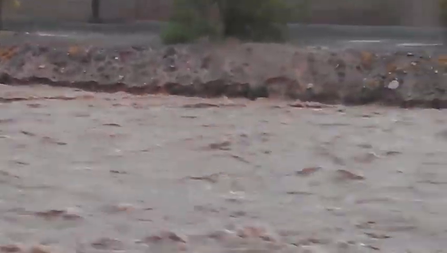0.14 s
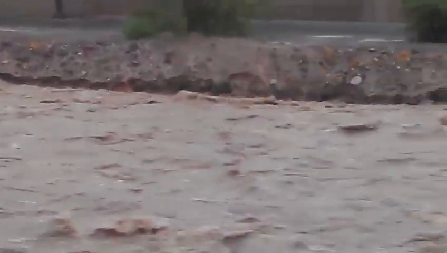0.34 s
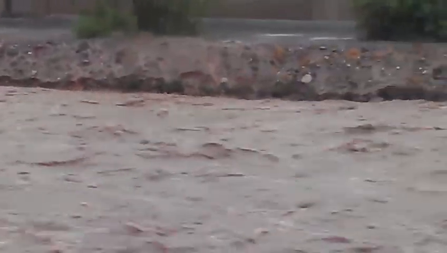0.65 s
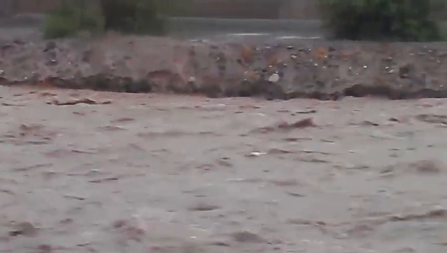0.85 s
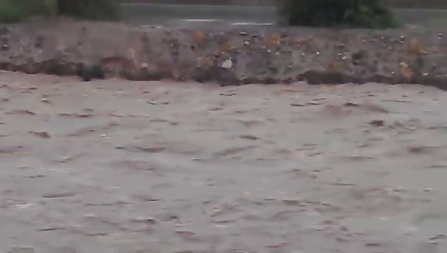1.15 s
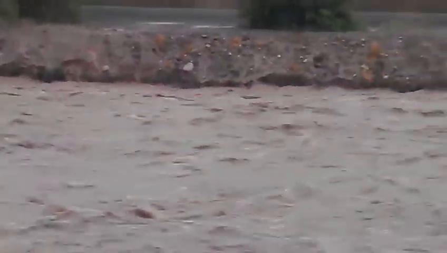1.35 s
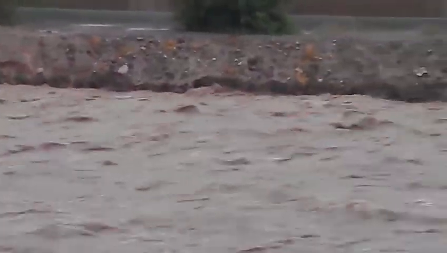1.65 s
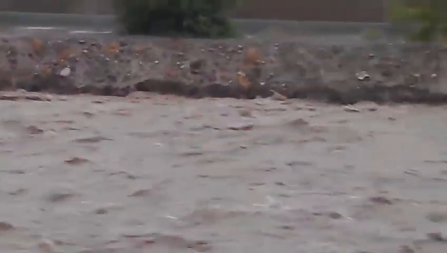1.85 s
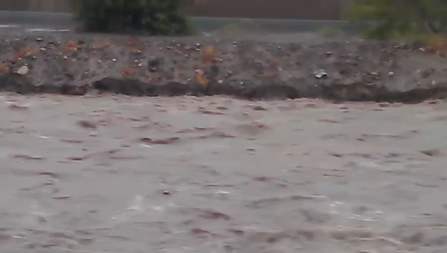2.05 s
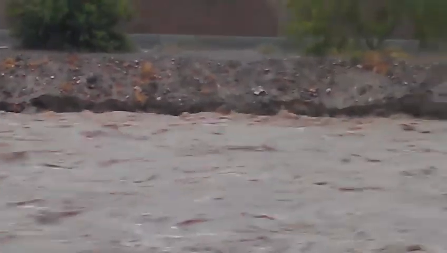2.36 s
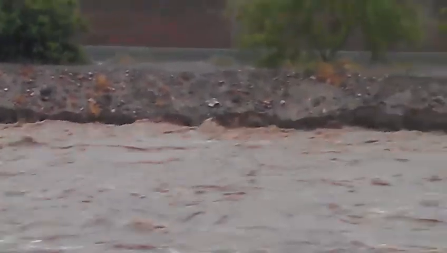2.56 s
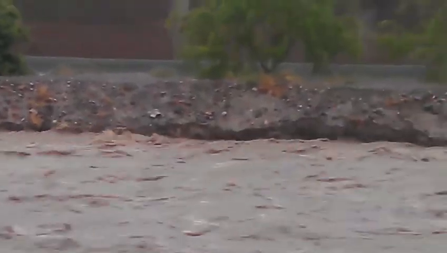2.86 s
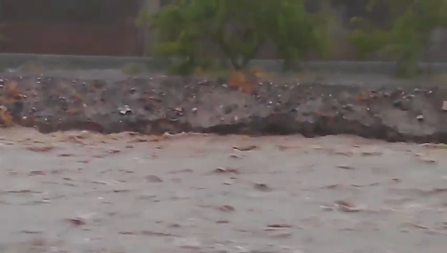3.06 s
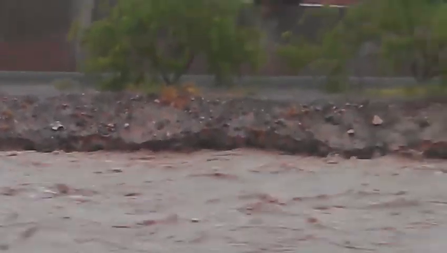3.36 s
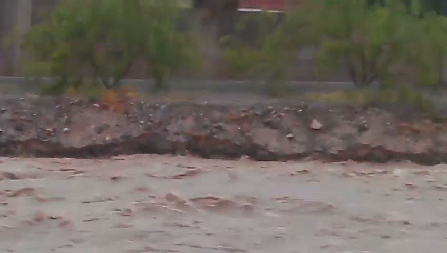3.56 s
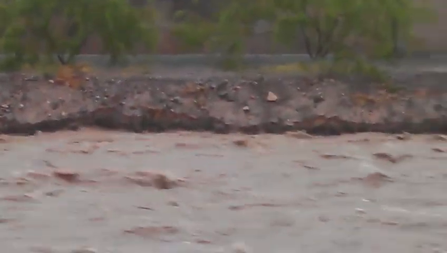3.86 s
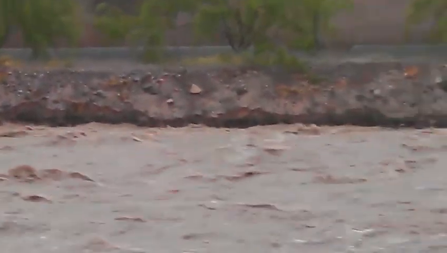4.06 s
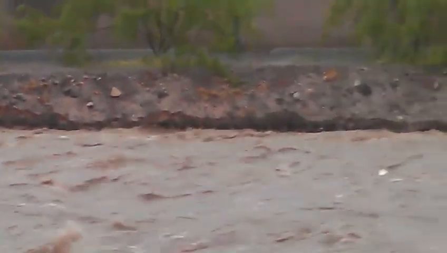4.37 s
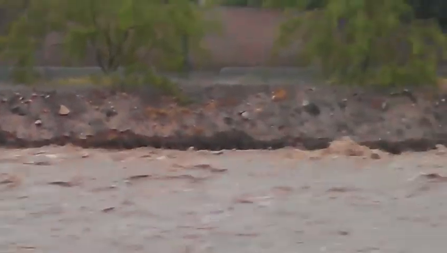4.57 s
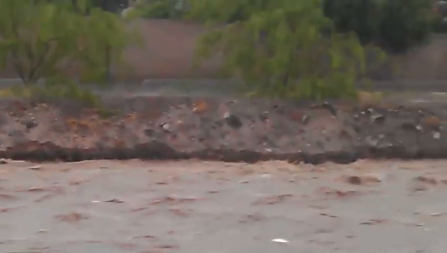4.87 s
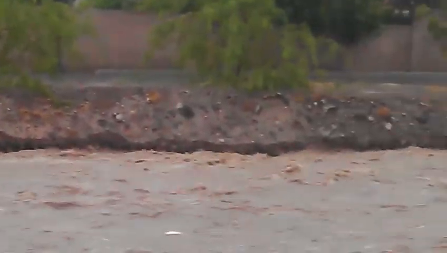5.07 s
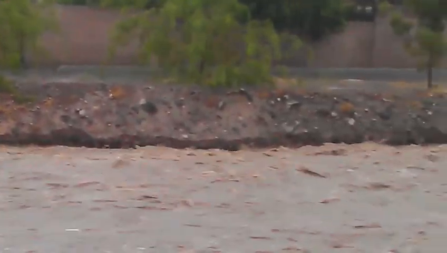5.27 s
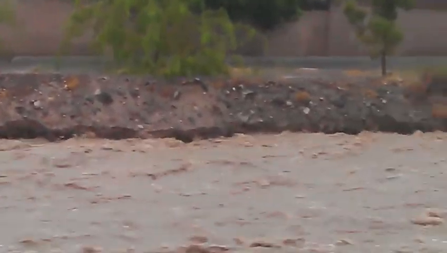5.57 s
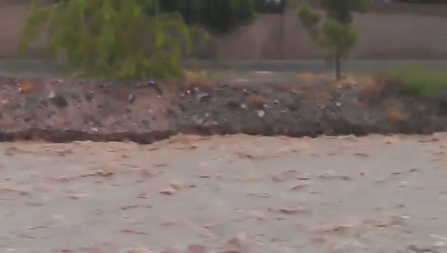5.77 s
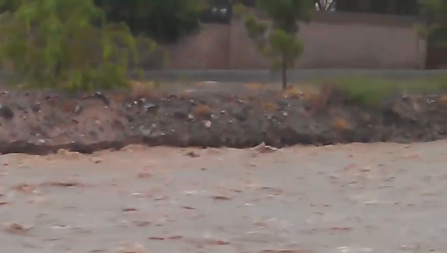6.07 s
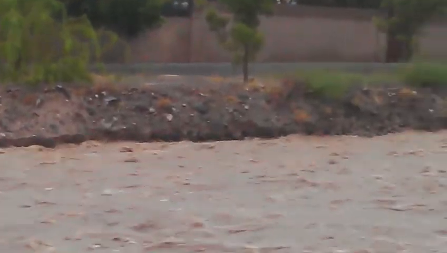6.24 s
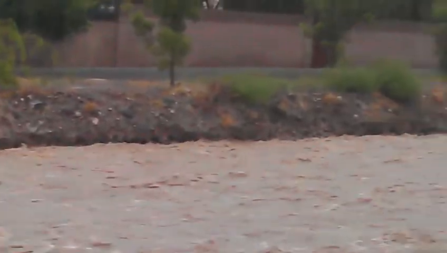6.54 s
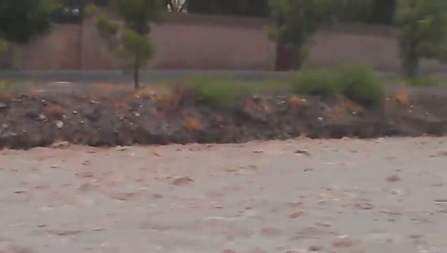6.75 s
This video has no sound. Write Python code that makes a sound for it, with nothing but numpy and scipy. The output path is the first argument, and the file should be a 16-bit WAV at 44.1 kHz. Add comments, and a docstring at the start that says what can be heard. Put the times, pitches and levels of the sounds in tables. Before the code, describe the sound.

Fast muddy flood water roars steadily past a stony bank, thick with hollow gulps and bubbling over a low rumble and dull hiss.

```python
"""Muddy flood in a stony channel

Racing water gives a lumpy rumble, a low roar and a dull hiss of torn surface: shaped noise with wandering levels.
Countless small bubbles and hollow gulps, where waves fold over pockets of air, are short gliding sine rings.
A small mono microphone with gain control hears it; a widener adds a delayed copy to one channel
and takes it from the other."""
import sys
import numpy as np
from scipy import signal
from scipy.fft import rfft, irfft, next_fast_len
from scipy.io import wavfile
from scipy.ndimage import uniform_filter1d, minimum_filter1d, map_coordinates

SR = 44100
rng = np.random.default_rng(int(sys.argv[2]) if len(sys.argv) > 2 else 0)


def store_pcm(level_fs):
    """Save levels as 16-bit WAV."""
    pcm = np.round(np.clip(level_fs, -1, 1) * 32767).astype(np.int16)
    wavfile.write(sys.argv[1], SR, np.atleast_2d(pcm).T)


N = 304731

# Rumble level before the surge. Each row: time in seconds, level in dB.
RUMBLE_LEVEL = [(0, -43), (.7, -42), (1.1, -42.5), (1.9, -39.5), (2.5, -42.5), (3.2, -45), (3.6, -39.5),
                (4.1, -37), (4.5, -43.5), (5.0, -40), (5.7, -33.5), (6.2, -41), (6.6, -40.5), (6.91, -36)]
# Rumble spectrum. Each row: frequency in Hz, relative density in dB per Hz.
RUMBLE_SPECTRUM = [(15, -74.5), (25, -55.5), (81, -23.5), (200, 0), (260, -22.5), (440, -120)]
# Flow levels before surge and wobble. Each row: time in seconds, low roar in dB, upper roar in dB, hiss in dB.
FLOW_LEVEL = [(0, -23.5, -29, -34), (.13, -26, -25, -34.5), (.4, -21, -26, -34.5), (.65, -26.5, -26.5, -35),
              (.95, -22.5, -25.5, -31), (1.17, -26, -25.5, -34), (1.4, -23.5, -26, -31.5),
              (1.56, -24.5, -27.5, -34), (1.75, -23.5, -27.5, -33.5), (1.9, -26.5, -25, -33),
              (1.96, -25, -27.5, -36.5), (2.1, -23, -26.5, -35.5), (2.3, -25, -27.5, -32),
              (2.42, -24, -25, -34), (2.5, -28.5, -24, -33), (2.7, -22.5, -26, -32.5),
              (3.0, -28.5, -25.5, -33.5), (3.17, -24.5, -26, -34), (3.33, -27, -26.5, -32.5),
              (3.43, -29, -24.5, -33.5), (3.54, -26.5, -24, -33), (3.6, -26, -28, -35.5),
              (3.8, -26, -24.5, -32.5), (4.0, -25.5, -27.5, -33), (4.08, -26, -27, -35),
              (4.15, -21.5, -27, -33.5), (4.3, -27.5, -26.5, -35), (4.55, -27.5, -24.5, -31.5),
              (4.69, -25.5, -29, -35.5), (4.75, -22.5, -25, -31.5), (4.82, -33.5, -32, -38),
              (4.93, -21.5, -26, -31.5), (5.15, -26.5, -27, -33.5), (5.5, -23.5, -26.5, -33.5),
              (5.8, -25.5, -28.5, -33.5), (6.0, -26, -25.5, -33), (6.22, -20, -29, -32),
              (6.38, -29, -28, -36.5), (6.48, -26.5, -28, -31.5), (6.64, -21, -27.5, -35),
              (6.71, -32, -30.5, -34.5), (6.79, -19.5, -26.5, -33), (6.91, -25.5, -32, -34.5)]
# Roar spectrum. Each row: frequency in Hz, relative density in dB per Hz.
ROAR_SPECTRUM = [(110, -44), (190, -12.5), (328, 0), (436, 0), (660, -5.5), (805, -1.5), (1030, -6),
                 (1280, -14.5), (1500, -16), (1950, -39), (3300, -120)]
# Surface hiss spectrum. Each row: frequency in Hz, relative density in dB per Hz.
HISS_SPECTRUM = [(650, -34.5), (1100, -5.5), (1340, -10), (1570, -3), (2350, -8.5), (2770, -12.5),
                 (3720, -17.5), (4250, -22.5), (4940, -23), (5480, -26.5), (6670, -42.5), (7000, -50.5),
                 (7280, -68.5), (9460, -91), (16000, -120)]
# Slosh spectrum. Each row: frequency in Hz, relative density in dB per Hz.
SLOSH_SPECTRUM = [(60, -120), (140, -20), (250, -2.5), (450, -4), (700, -3.5), (1200, -23.5), (3000, -120)]
# Gulps before the bass cut. Each row: time of peak in seconds, peak in dB, pitch at peak in Hz,
# length in cycles (before limiting).
GULP_EVENTS = [(0.205, -18.5, 268, 5.4), (0.382, -11.5, 463, 4.7), (0.502, -14, 395, 3.5),
               (0.539, -10.5, 354, 6.6), (0.581, -10, 520, 6.3), (0.667, -11, 478, 13),
               (0.705, -13, 440, 13), (0.739, -12.5, 279, 4.6), (0.788, -7, 392, 1.8),
               (0.793, -20, 760, 4.5), (0.821, -10, 460, 3.6), (0.893, -19, 400, 7.4), (0.948, -14, 417, 4),
               (1.084, -11.5, 750, 6.1), (1.141, -15.5, 754, 5.7), (1.249, -15.5, 323, 4.1),
               (1.343, -14, 616, 9.2), (1.359, -18, 322, 4.5), (1.398, -16.5, 404, 6.2),
               (1.428, -15, 404, 6.2), (1.445, -13.5, 747, 6.2), (1.491, -6.5, 453, 3.7),
               (1.501, -5.5, 380, 1.7), (1.513, -22, 218, 4.8), (1.519, -6.5, 440, 4.6),
               (1.71, -20.5, 250, 5.2), (1.773, -14.5, 323, 4.5), (1.801, -13, 867, 6.5),
               (1.809, -15, 425, 18), (1.912, -12.5, 500, 12), (1.921, -4, 457, 3.2),
               (1.977, -11, 643, 3.8), (1.98, -14.5, 430, 2.9), (2.028, -19, 820, 4.2),
               (2.051, -9.5, 482, 4.9), (2.121, -11, 496, 12), (2.241, -16.5, 960, 5.3),
               (2.274, -20, 1485, 9.9), (2.312, -11, 484, 3.1), (2.322, -13.5, 792, 6.4),
               (2.34, -16.5, 317, 4.1), (2.423, -16, 353, 18), (2.441, -17.5, 484, 5.6),
               (2.458, -20, 254, 4), (2.476, -14, 566, 5), (2.481, -15, 389, 4.2), (2.567, -12, 316, 3),
               (2.611, -13, 623, 5), (2.637, -16, 1170, 6.4), (2.687, -14.5, 514, 5.5),
               (2.69, -16, 195, 4.1), (2.702, -13, 292, 4.1), (2.72, -13.5, 476, 12),
               (2.771, -19.5, 1440, 5.6), (2.805, -14.5, 310, 4.5), (2.932, -19.5, 810, 7.8),
               (2.95, -22, 227, 3.9), (2.968, -19.5, 247, 6.6), (2.985, -10.5, 487, 3.2),
               (2.989, -14, 273, 2.7), (3.095, -14, 720, 5.7), (3.149, -13.5, 800, 11),
               (3.185, -8, 468, 4.4), (3.185, -15.5, 248, 1.9), (3.33, -20, 1593, 13),
               (3.342, -20.5, 278, 5.9), (3.374, -15.5, 364, 5), (3.394, -13.5, 363, 5),
               (3.581, -25.5, 368, 5.9), (3.59, -11.5, 253, 4.0), (3.592, -24, 155.6, 3),
               (3.608, -16, 222, 1.8), (3.795, -17.5, 1080, 5.5), (3.866, -12.5, 442, 4.6),
               (4.015, -13, 510, 5.4), (4.058, -17, 250, 2.5), (4.077, -13.5, 362, 5.5),
               (4.114, -12, 370, 4.6), (4.179, -15, 376, 8.8), (4.211, -23.5, 190, 3.6),
               (4.215, -9, 386, 3.6), (4.302, -14, 474, 6), (4.312, -19.5, 259, 4.5),
               (4.351, -14, 397, 4.1), (4.401, -13, 425, 3.5), (4.427, -13, 380, 6),
               (4.596, -16.5, 820, 5.1), (4.617, -10.5, 361, 5.3), (4.727, -15, 361, 7),
               (4.747, -20, 1340, 4.8), (4.785, -10, 546, 7.6), (4.793, -8, 374, 2.3), (4.89, -28, 154, 3),
               (4.9, -15, 296, 3.8), (5.041, -8, 376, 6.1), (5.321, -26.5, 204, 3.8),
               (5.33, -17.5, 404, 6.2), (5.362, -18.5, 507, 6.7), (5.413, -13, 373, 6.9),
               (5.424, -21, 208, 5.3), (5.424, -8.5, 510, 4.2), (5.531, -20, 292, 5),
               (5.62, -27, 158.4, 3.8), (5.697, -21, 1524, 8.9), (5.733, -8, 670, 1.7),
               (5.742, -20.5, 200, 2.9), (5.767, -15.5, 285, 3.3), (5.897, -17, 320, 3.8),
               (6.006, -13, 527, 8.5), (6.067, -12.5, 404, 3.4), (6.077, -20, 210, 6),
               (6.168, -9.5, 280, 1.9), (6.28, -13.5, 330, 4.1), (6.291, -21.5, 227, 4.7),
               (6.33, -6.5, 468, 2.6), (6.476, -14.5, 437, 5.8), (6.489, -14, 415, 6.2),
               (6.52, -20, 810, 4.7), (6.552, -14.5, 251, 2.4), (6.559, -8.5, 406, 5.8),
               (6.567, -16.5, 205, 3.8), (6.641, -14, 620, 3.8), (6.65, -8.5, 346, 5.3),
               (6.694, -14, 422, 4.3), (6.732, -20, 1590, 3.9), (6.781, -14, 496, 7.3),
               (6.79, -16, 263, 9.0), (6.798, -17.5, 494, 14), (6.888, -16, 540, 8.8)]
# Widener copy. Each row: frequency in Hz, gain in dB, phase lead in radians.
WIDENER_COPY = [(100, 1.5, .12), (250, 0.3, .15), (450, -0.5, .38), (750, -1.5, .4), (1100, -2.5, .3),
                (1600, -1.5, .12), (3500, -2.5, .05), (7000, -3, .01)]

ROAR_SPLIT_HZ = 590  # low roar below, upper roar above
COPY_LAG_S, LATE_COPY_LAG_S = 72 / 44100, 178 / 44100
TOP_HZ = 7400


def amp(db):
    """Gain of a level in dB."""
    return 10 ** (np.asarray(db) / 20)


def unit(x):
    """x at rms 1."""
    return x / np.sqrt(np.mean(x ** 2) + 1e-20)


def columns(rows, at, scale=lambda v: v):
    """Every column after the first, interpolated at the given places."""
    first, *rest = np.transpose(rows)
    return [np.interp(scale(at), scale(first), column) for column in rest]


def wobble(rate_hz):
    """Smooth random curve through rate_hz knots a second."""
    place = np.arange(N) * rate_hz / SR
    knots = rng.standard_normal(int(N * rate_hz / SR) + 4)
    return map_coordinates(knots, [place])


def filtered(x, response):
    """x times a complex response of frequency in Hz."""
    size = next_fast_len(N + 8192)
    hz = np.fft.rfftfreq(size, 1 / SR)
    return irfft(rfft(x, size) * response(hz), size)[..., :N]


def spectrum_gain(spectrum, hz):
    """Gain read from (Hz, dB) points on a log frequency axis."""
    return amp(columns(spectrum, hz, np.log1p)[0])


def coloured(x, spectrum):
    """x shaped by a spectrum, at rms 1."""
    return unit(filtered(x, lambda hz: spectrum_gain(spectrum, hz)))


def smoothed(x, time_s):
    """One-pole average with the given time constant."""
    keep = np.exp(-1 / (time_s * SR))
    return signal.lfilter([1 - keep], [1, -keep], x)


def patchy_noise(depth_db, frames):
    """White noise with random gain patches over time and frequency; a frame is about 6 ms."""
    bins = signal.stft(rng.standard_normal(N), SR, nperseg=512)[2]
    field = uniform_filter1d(rng.standard_normal(bins.shape), size=9, axis=0)
    field = unit(uniform_filter1d(field, size=frames, axis=1))
    return signal.istft(bins * amp(depth_db * field), SR, nperseg=512)[1][:N]


def air_pockets(peak_s, peak_db, hz, cycles, glide, size, snap=1):
    """Sine rings that swell and fade over a few cycles as pitch glides; snap quickens the swell, slows the fade."""
    k = np.arange(size) - size // 2
    cycles = np.clip(cycles, 2.5, 12)
    lives = k * (hz / cycles)[:, None] / SR  # time from the peak, in lives of the pocket
    swell = np.exp(-8 * np.where(lives < 0, snap * lives, lives / snap) ** 2)
    turns = cycles[:, None] * (lives + glide[:, None] * lives * lives / 2)
    rings = amp(peak_db)[:, None] * swell * np.sin(2 * np.pi * turns)
    # Padding of one ring at each end keeps every index positive.
    at = np.round(peak_s * SR).astype(int)[:, None] + k + size
    return np.bincount(at.ravel(), rings.ravel(), N + 2 * size)[size:N + size]


def bubbles(count, mid_hz, spread_octaves, spread_db, cycles, size):
    """Dense random crowd of air pockets of unlike pitch and strength, gliding up, at rms 1."""
    peak_s = rng.random(count) * N / SR
    hz = mid_hz * 2 ** (spread_octaves * np.clip(rng.standard_normal(count), -2, 2))
    peak_db = spread_db * np.clip(rng.standard_normal(count), -2, 2)
    return unit(air_pockets(peak_s, peak_db, hz, np.full(count, cycles), np.full(count, .2), size))


def rumble(surge_db):
    """Lumpy bass: low noise whose level wobbles strongly."""
    lumps = amp(6.6 * wobble(9)) * coloured(rng.standard_normal(N), RUMBLE_SPECTRUM)
    level_db, = columns(RUMBLE_LEVEL, np.arange(N) / SR)
    return amp(level_db + surge_db) * unit(lumps)


def roar(surge_db, low_db, upper_db, fold):
    """Churning noise in two bands, big bubbles in the low one; each fold of a wave thins the low band."""
    churn = coloured(patchy_noise(depth_db=0.69, frames=5), ROAR_SPECTRUM)
    big = bubbles(count=900, mid_hz=352.0, spread_octaves=0.43, spread_db=3.0, cycles=3.9, size=2400)

    def low_share(hz):
        return 1 / (1 + (hz / ROAR_SPLIT_HZ) ** 8)

    low = filtered(churn, lambda hz: np.sqrt(low_share(hz))) + amp(-12.5) * big
    upper = filtered(churn, lambda hz: np.sqrt(1 - low_share(hz)))
    low_gain = amp(low_db + surge_db + 0.9 * wobble(24)) / (1 + fold / amp(-8.5))
    upper_gain = amp(upper_db + surge_db + 1.2 * wobble(26))
    return low_gain * unit(low) + upper_gain * unit(upper)


def hiss(surge_db, level_db):
    """Torn surface: patchy dull noise with small bubbles and spatter riding on it."""
    small = bubbles(count=9000, mid_hz=1770, spread_octaves=0.47, spread_db=4.0, cycles=3.0, size=500)
    spatter = bubbles(count=1500, mid_hz=2620, spread_octaves=0.49, spread_db=2.0, cycles=3.6, size=400)
    spray = coloured(patchy_noise(depth_db=1.47, frames=3), HISS_SPECTRUM)
    spray = spray + amp(-7.0) * small + amp(-17.5) * spatter
    return amp(level_db + surge_db + 0.49 * wobble(34)) * unit(spray)


def slosh(fold):
    """Burst of noise in the wake of each fold, following its strength."""
    return amp(-6) * fold * coloured(rng.standard_normal(N), SLOSH_SPECTRUM)


def flood(folds):
    """Rumble, roar and hiss surge together and each on its own; folds thin the low roar and leave slosh."""
    low_db, upper_db, hiss_db = columns(FLOW_LEVEL, np.arange(N) / SR)
    surge_db = 0.3 * wobble(18) + 0.7 * wobble(32)
    power = smoothed(uniform_filter1d(folds ** 2, size=200), time_s=0.012)
    fold = np.sqrt(np.abs(power))
    return rumble(surge_db) + roar(surge_db, low_db, upper_db, fold) + hiss(surge_db, hiss_db) + slosh(fold)


def gulps():
    """Waves fold over air pockets, whose pitch mostly sags a little; deep bass is cut."""
    peak_s, peak_db, hz, cycles = np.transpose(GULP_EVENTS)
    glide = rng.normal(-0.17, 0.081, len(peak_s))
    rings = air_pockets(peak_s, peak_db, hz, cycles, glide, size=4000, snap=1.24)
    return filtered(rings, lambda f: 1 / (1 + (105 / (f + 1)) ** 6))


def scene():
    """All the water reaches one microphone: two equal channels."""
    folds = gulps()
    return np.tile(flood(folds) + folds, (2, 1))


def gain_control(x, knee_db, strength, smoothing_s):
    """Peaks over the knee, held for 10 ms and smoothed, pull the gain down by strength dB per dB."""
    peak_db = 20 * np.log10(np.abs(x) + 1e-9)
    over_db = -minimum_filter1d(-np.maximum(peak_db - knee_db, 0), size=441, origin=220)
    return x * amp(-strength * smoothed(over_db, smoothing_s))


def widener(hz):
    """Response of the side signal: a delayed inverted copy, then a weaker later one of the treble."""
    copy_db, lead_rad = columns(WIDENER_COPY, hz, np.log1p)
    copy = amp(copy_db) * np.exp(1j * lead_rad - 2j * np.pi * hz * COPY_LAG_S)
    treble = amp(-12.0) / (1 + (2800 / (hz + 1)) ** 4)
    return treble * np.exp(-2j * np.pi * hz * LATE_COPY_LAG_S) - copy


def faint_hiss():
    """Treble noise, independent in the two channels, at rms 1."""
    noise = rng.standard_normal((2, N))
    return unit(filtered(noise, lambda hz: spectrum_gain(HISS_SPECTRUM, hz) / (1 + (3300 / (hz + 1)) ** 4)))


def record(dry):
    """Gain control, bass cut, widener, faint hiss, soft overload, band limit."""
    held = gain_control(dry[0], knee_db=-11.5, strength=0.99, smoothing_s=0.059)
    mid = filtered(held, lambda hz: (1j * hz / (45 + 1j * hz)) ** 2)
    side = filtered(mid, widener)
    wide = np.array([mid + side, mid - side]) + amp(-56) * faint_hiss()
    limited = wide / (1 + np.abs(wide / .99) ** 14) ** (1 / 14)
    return filtered(limited, lambda hz: hz < TOP_HZ)


dry = scene()
out = record(dry)
store_pcm(out)
```